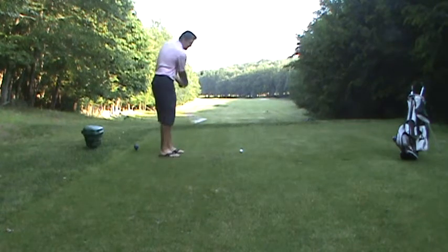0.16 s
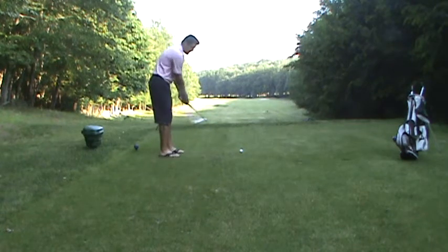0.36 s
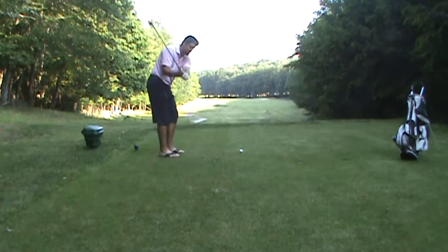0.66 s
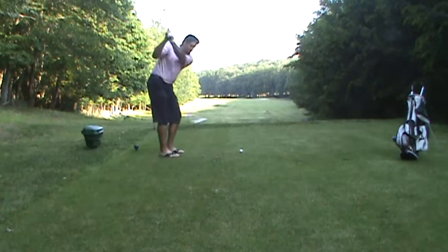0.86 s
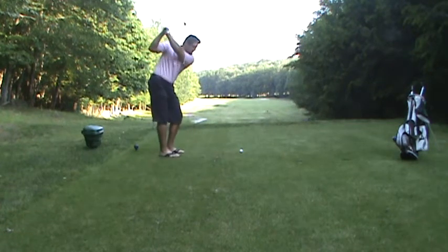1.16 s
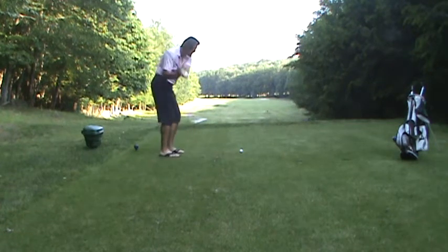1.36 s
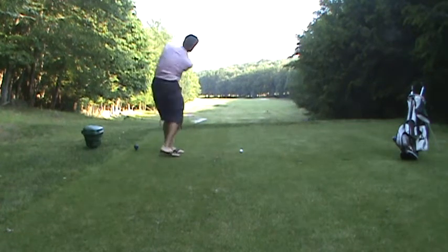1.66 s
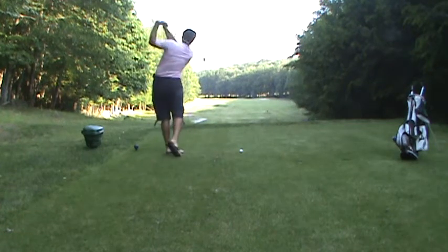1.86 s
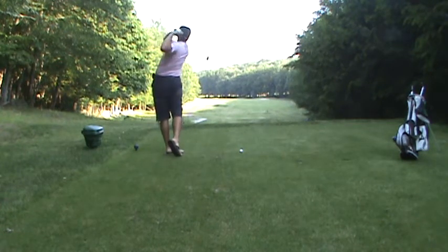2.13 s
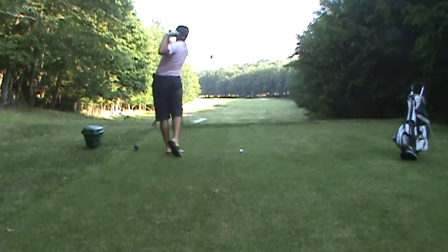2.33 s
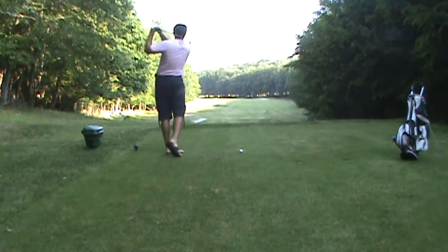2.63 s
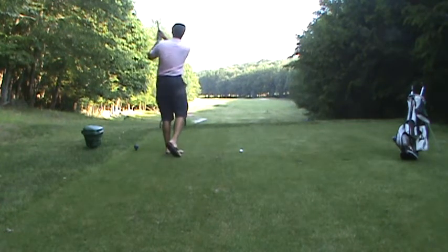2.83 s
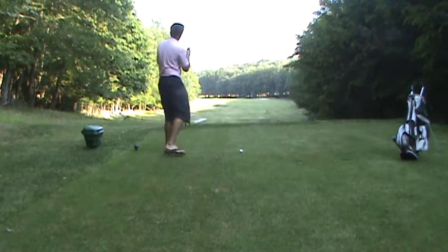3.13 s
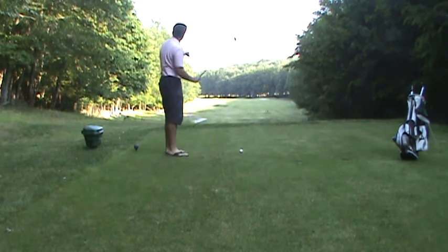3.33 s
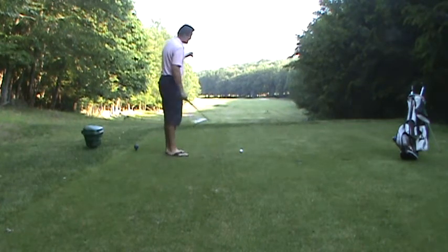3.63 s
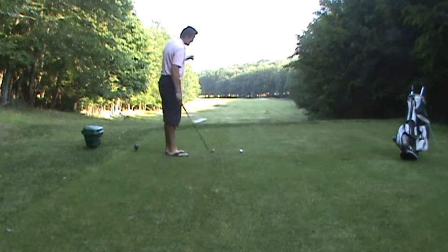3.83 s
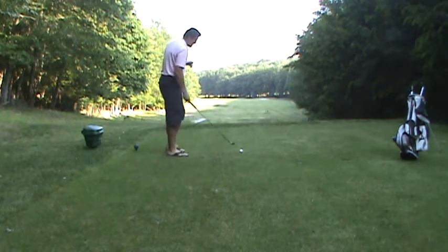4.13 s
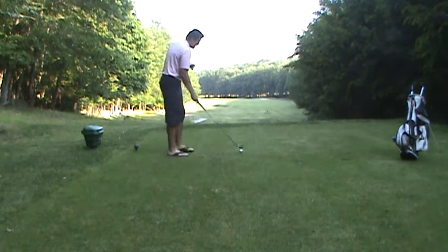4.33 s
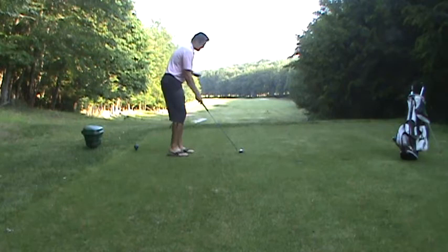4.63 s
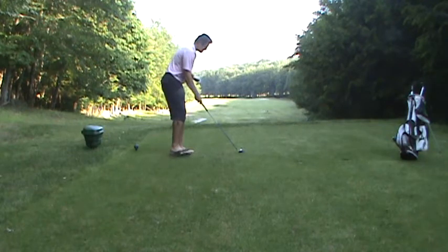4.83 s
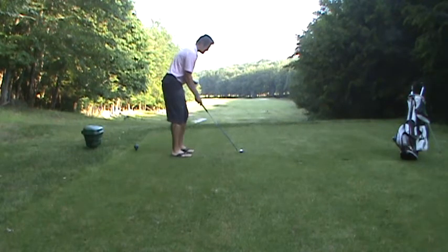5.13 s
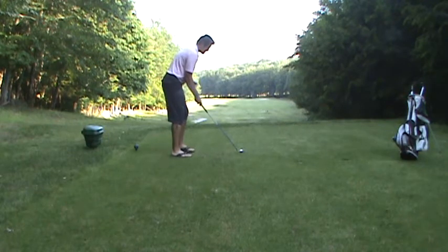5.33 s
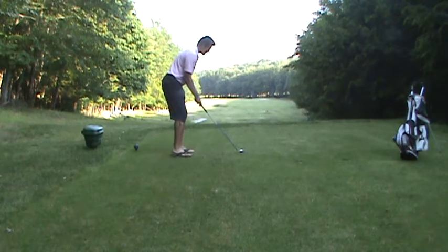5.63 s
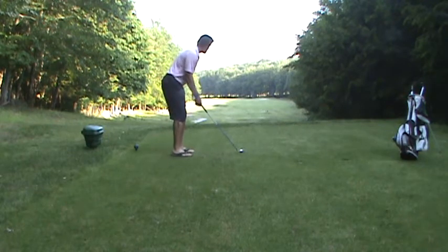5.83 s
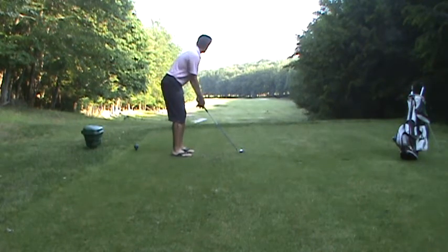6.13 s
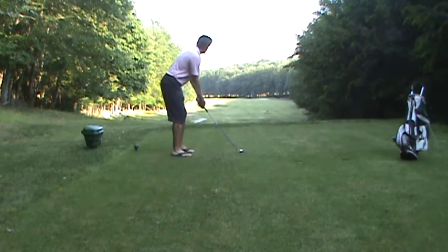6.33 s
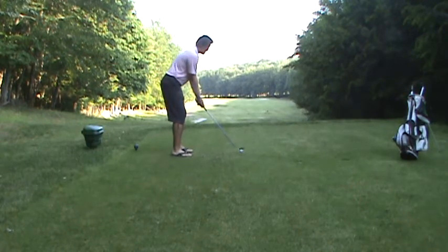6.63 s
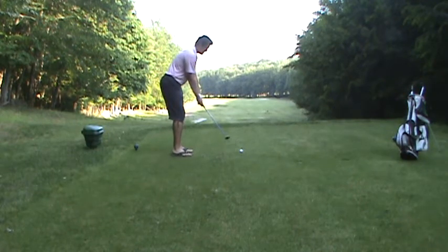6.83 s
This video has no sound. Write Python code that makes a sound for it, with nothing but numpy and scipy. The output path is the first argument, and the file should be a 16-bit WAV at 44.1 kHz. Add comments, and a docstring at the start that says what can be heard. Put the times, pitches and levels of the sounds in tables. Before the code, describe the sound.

On a quiet golf tee between woods, distant engines drone over a low rumble and airy hiss. A golfer takes one practice swing, a brief swish over the grass. A sandal then slaps against a heel and the club head drops softly on the turf. Songbirds warble from the trees to the left while a small bird chips close by, and the drone grows a little louder.

```python
"""A far engine drones over a low rumble and airy hiss, on a quiet golf tee between woods.
Its partials sink in pitch as it passes, beating with a second engine. Songbirds warble in gliding
whistles that the trees scatter, and a small bird chips close by. A golfer takes a practice swing:
the shaft sheds eddies and swishes over the grass, then a sandal slaps and the club head is set
down, each a short knock of damped modes."""
import sys
import numpy as np
from scipy import signal
from scipy.io import wavfile

SR = 44100
rng = np.random.default_rng(int(sys.argv[2]) if len(sys.argv) > 2 else 0)


def store_wav(level_fs):
    """Save 16-bit WAV to argv[1]."""
    pcm = np.round(np.clip(np.atleast_2d(level_fs), -1, 1) * 32767)
    wavfile.write(sys.argv[1], SR, pcm.T.astype(np.int16))


N = 307377
TIME = np.arange(N) / SR

# colours of exhaust rumble, far roar, deep air and air hiss: (frequency [Hz], relative density [dB])
RUMBLE_COLOUR = [(20, -40), (36, -28), (55, -10), (80, 0), (120, -2), (170, 1.5), (215, -2.5), (270, -8),
                 (330, -17.5), (420, -30)]
ROAR_COLOUR = [(180, -23), (300, -4), (368, -2.5), (416, 0.5), (540, -4.5), (829, -2.5), (1120, -5.5),
               (1210, -10.5), (1700, -14), (2210, -25), (3740, -120)]
DEEP_AIR_COLOUR = [(20, -17), (36, -3.5), (55, -0.5), (75, -5)]
HISS_COLOUR = [(760, -13), (1300, -0.5), (2080, -2), (2540, -2), (3330, -3.5), (4950, -5), (7220, -15.5),
               (8270, -11.5), (8990, -7.5), (10800, -15), (15200, -16), (15800, -14.5)]
# fader rides of the low bed, before its boost: (time [s], rumble level [dB], roar level [dB])
BED_RIDES = [(0, -51.5, -58.5), (0.9, -46.5, -58.5), (1.3, -54, -57.5), (2.1, -49.5, -58), (3.3, -47, -54),
             (5.1, -47.5, -56), (5.9, -46, -54), (6.96, -47.5, -57.5)]
# stereo image of the noises: (frequency [Hz], left-right likeness [1 = mono])
STEREO_LIKENESS = [(60, 0.99), (130, .98), (290, 0.64), (640, 0.18), (1410, 0.14), (3100, 0.56),
                   (6820, 0.45), (15000, 1)]

# firing note of the passing engine: (time [s], level [dB])
FIRING_RIDE = [(0, -57), (.6, -51), (1.7, -58), (2.2, -40.5), (2.6, -43), (3, -36.5), (4.1, -35),
               (4.7, -37.5), (5.3, -39), (5.85, -34), (6.3, -41), (6.96, -38)]
# overtones that open up as it drives away:
# (multiple of the cycle rate, level before [dB], level after [dB], time of the change [s])
OPENING_PARTIALS = [(8, -50.5, -45.5, 3.65), (10, -58, -40.5, 4.7)]
# its weak partials: (multiple of the cycle rate, level from the closest point on [dB])
WEAK_PARTIALS = [(2, -64.5), (3, -62), (4, -53.5), (6, -54.5), (7, -53), (9, -54), (11, -60), (13, -66),
                 (15, -59.5), (25, -67)]
# second engine, speeding up: (time [s], firing rate [Hz], level [dB])
SECOND_ENGINE_RIDE = [(0, 93.4, -52), (.9, 93.7, -49.5), (1.5, 97, -44), (2.1, 100.7, -42.5),
                      (2.6, 105, -49), (3.2, 105.1, -42.5), (4.2, 103.1, -48.5), (5.5, 103.5, -47),
                      (6.97, 103.5, -50)]
# faint machine whine: (pitch [Hz], level [dB])
WHINE_TONES = [(701, -69.5), (840.5, -68.5)]

# far bird phrases and echoes of the near songbird, scattered by the trees:
# (start [s], length [s], centre pitch [Hz], level into the echo [dB])
SCATTERED_PHRASES = [(.14, .2, 3600, -58), (.37, .24, 2750, -60), (1.49, .13, 4000, -54.5),
                     (1.6, .15, 2950, -56.5), (2.499, .3, 3750, -55), (3.65, 0.27, 4496, -57),
                     (3.95, .27, 2950, -52.5), (4.6, .14, 2300, -54.5), (4.961, .3, 3100, -52.5),
                     (5.551, 0.12, 2276, -56), (6.139, 0.25, 2850, -55)]
# thin high whistles of a far bird: (start [s], level into the echo [dB])
THIN_WHISTLES = [(.29, -69.5), (.93, -68.5), (1.44, -66.5), (2.13, -68), (2.75, -68), (3.23, -66),
                 (3.8, -68), (4.52, -66), (4.93, -65.5), (5.55, -68.5), (6.5, -70)]
# the songbird's syllables, by name: (start pitch, end pitch) [ratios to the middle pitch]
SYLLABLE_BENDS = {"fall": (1.15, .83), "rise": (.88, 1.19), "arch": (.89, .87), "hold": (.96, .95),
                  "sag": (1.1, .98)}
# its song: (start [s], length [s], middle pitch [Hz], level before the mix [dB], syllable name)
SONG_NOTES = [(2.46, .05, 2483, -55, "sag"), (2.558, .066, 2210, -54.5, "sag"),
              (2.665, 0.071, 2560, -51.5, "arch"), (3.045, .058, 2800, -52.5, "arch"),
              (3.15, .06, 2880, -53.5, "arch"), (3.29, .2, 3030, -64, "hold"),
              (3.375, .022, 2410, -55, "rise"), (3.42, .028, 2410, -55.5, "sag"),
              (3.495, .059, 2524, -52, "rise"), (3.55, 0.081, 2360, -49.5, "sag"),
              (3.662, 0.038, 2340, -51, "arch"), (3.774, 0.052, 1980, -55, "sag"),
              (3.87, 0.056, 2280, -57, "sag"), (4.481, 0.072, 2210, -58.5, "hold"),
              (4.553, .071, 2447, -52.5, "fall"), (4.644, 0.057, 2330, -50.5, "fall"),
              (4.762, .04, 2360, -52, "rise"), (4.8, .046, 2400, -51.5, "fall"),
              (5.079, 0.068, 2095, -55, "hold"), (5.54, 0.17, 3003, -58.5, "hold"),
              (5.599, .03, 2420, -49, "hold"), (6.183, .072, 2026, -56, "hold")]
# double chips of the small bird: (start [s], level before shaping [dB])
CHIP_CUES = [(.565, -55), (1.557, -47), (2.017, -46.5), (3.317, -44.5), (3.822, -45), (4.0, -51.5),
             (4.135, -52), (4.555, -52), (4.705, -50.5), (5.208, -51.5), (5.515, -46.5), (5.934, -47.5),
             (6.528, -50), (6.868, -54)]
# contour of one chip: (time from its start [s], pitch [ratio to the lowest], relative level [dB])
CHIP_CONTOUR = [(0, 1.32, -27), (.005, 1.17, -8), (.01, 1.02, -7.5), (.016, 1, -5.5), (.02, 1.08, -7.5),
                (.023, 1.25, -9), (.028, 1.08, -10), (.036, 1.1, -13.5), (.043, 1.15, -9)]
# one loud downslurred call and a soft answer: (time [s], pitch [Hz], level [dB])
LOUD_CALL = [(5.364, 11300, -66), (5.369, 11100, -55), (5.38, 7800, -43), (5.387, 6970, -41.5),
             (5.396, 6760, -40), (5.405, 6950, -47), (5.419, 7300, -48), (5.423, 7400, -66)]
SOFT_ANSWER = [(5.855, 7880, -67), (5.88, 7920, -58), (5.89, 7700, -62), (5.9, 7570, -52),
               (5.912, 7550, -72)]

# swell of the swish: (time [s], level [dB])
SWISH_RIDE = [(1.46, -66), (1.52, -50), (1.543, -41.5), (1.556, -51), (1.6, -48), (1.68, -67), (1.75, -95)]
# colour of the shaft's eddies: (frequency [Hz], relative density [dB])
SWISH_COLOUR = [(200, -8), (350, 4), (500, 7), (750, -8.5), (1000, -5), (1600, -17), (4200, -16),
                (8000, -20), (15000, -27)]
# modes of the sandal slap and of the club head on turf: (frequency [Hz], level [dB], t60 [s])
SANDAL_MODES = [(440, -29, 0.023), (700, -29.5, 0.013), (990, -33.5, 0.0092), (3720, -36, 0.0046),
                (4900, -35, 0.0043), (9000, -39, .002)]
TURF_MODES = [(252, -37, 0.11), (304, -31, .06), (425, -33.5, 0.041), (604, -37, 0.023)]


def from_db(db):
    """Decibels to gain."""
    return 10 ** (np.asarray(db) / 20)


def rms_one(x):
    """Scale to rms 1."""
    return x / np.sqrt(np.mean(x ** 2) + 1e-20)


def in_time(rows):
    """Draw each column after the time column as a curve over the whole scene."""
    times, *columns = np.transpose(rows)
    return [np.interp(TIME, times, column) for column in columns]


def at_hz(points, hz):
    """Read a curve on a log-frequency axis."""
    frequencies, values = np.transpose(points)
    return np.interp(np.log(hz), np.log(frequencies), values)


def drift(rate_hz):
    """A smooth random modulator of rms 1, rolling off above rate_hz."""
    hop, settle = 40, 2000
    pole = np.exp(-2 * np.pi * rate_hz * hop / SR)
    white = rng.standard_normal(N // hop + settle + 2)
    slow = signal.lfilter([1], [1, -2 * pole, pole * pole], white)[settle:]
    return np.interp(np.arange(N) / hop, np.arange(len(slow)), rms_one(slow))


def tone(hz):
    """A sine of rms 1 that follows a pitch curve."""
    return np.sqrt(2) * np.sin(2 * np.pi * (np.cumsum(hz) / SR + rng.random()))


def add(out, start_s, sound):
    """Mix a sound in at its cue."""
    i = max(0, round(start_s * SR))
    out[i:i + len(sound)] += sound[:max(0, N - i)]


def pan(x, left_db):
    """Place a sound by its left-minus-right level."""
    return x * from_db([[left_db / 2], [-left_db / 2]])


def widen(mid, side, alike):
    """Blend two noises into stereo: alike is 1 for mono, 0 for fully wide."""
    return np.sqrt(1 + alike) * mid + np.sqrt(1 - alike) * side * [[1], [-1]]


def banded_noise(colour, flicker_db):
    """Third-octave bands of stereo noise, each with its own level, flicker and width; rms 1 in all."""
    out, edges = 0, np.geomspace(18, 18000, 31)
    white = rng.standard_normal((2, 2, N))
    for k, (low, high) in enumerate(zip(edges, edges[1:])):
        if high < colour[0][0] or low > colour[-1][0]:
            continue
        hz = np.sqrt(low * high)
        band = signal.butter(2, [low, high], "band", fs=SR, output="sos")
        mid, side = signal.sosfilt(band, white[k % 2])
        gain = from_db(at_hz(colour, hz) + flicker_db * drift(10.6))
        out = out + gain * widen(mid, side, at_hz(STEREO_LIKENESS, hz))
    return rms_one(out)


def woods(x, t60, alike=0.77, build_s=0.011):
    """Trunks and leaves scatter a sound into a dense dying tail, partly different on each side."""
    t = TIME[:SR]
    envelope = from_db(-60 * t / t60) * (1 - np.exp(-t / build_s))
    mid, side = rng.standard_normal((2, SR)) * envelope
    tail = rms_one(widen(mid, side, alike)) / np.sqrt(SR)
    return signal.fftconvolve(x[None], tail, axes=1)[:, :N]


def whistle(length_s, start_hz, middle_hz, end_hz, fade_s=0.006):
    """One pure note bending through three pitches, with soft ends."""
    progress = np.linspace(0, 1, round(length_s * SR))
    bend = np.polyfit([0, .5, 1], [start_hz, middle_hz, end_hz], 2)
    envelope = np.minimum(1, np.minimum(progress, 1 - progress) * length_s / fade_s)
    return tone(np.polyval(bend, progress)) * envelope


def glide(rows, octave_db):
    """A call along (time [s], pitch [Hz], level [dB]); the air absorbs its weak octave towards the top."""
    times, hz, db = np.transpose(rows)
    t = np.arange(times[0], times[-1], 1 / SR)
    pitch = np.interp(t, times, hz)
    air_gain = np.interp(2 * pitch, [13800, 15200], [1, 0])
    voice = tone(pitch) + from_db(octave_db) * tone(2 * pitch) * air_gain
    return from_db(np.interp(t, times, db)) * voice


def background(boost_db=4, air_db=-54.5):
    """The bed: exhaust rumble, a far roar, and the deep rumble and even hiss of open air."""
    rumble_db, roar_db = in_time(BED_RIDES)
    rumble = from_db(rumble_db + boost_db) * banded_noise(RUMBLE_COLOUR, flicker_db=2.0)
    roar = from_db(roar_db + boost_db) * banded_noise(ROAR_COLOUR, flicker_db=1.0)
    deep_air = banded_noise(DEEP_AIR_COLOUR, flicker_db=-0.5)
    hiss = banded_noise(HISS_COLOUR, flicker_db=0.42)
    return pan(rumble, -0.87) + pan(roar, -1.2) + from_db(air_db) * (deep_air + hiss)


def passing_engine(firing_hz=85.85, firing_order=5, doppler_hz=6.0, closest_s=3.83, pass_s=1.8):
    """Partials on multiples of the engine cycle sink as it passes; moving air makes the weak ones waver."""
    opening_s, approach_db, waver_db, wander_hz = 0.46, 4, 3, 0.91
    receding = (TIME - closest_s) / np.hypot(TIME - closest_s, pass_s)  # -1 coming, +1 going
    cycle_hz = (firing_hz - doppler_hz * receding) / firing_order * (1 + .002 * drift(3.7))
    firing_db, = in_time(FIRING_RIDE)
    out = from_db(firing_db + 1.03 * drift(3.6)) * tone(firing_order * cycle_hz)
    for order, before_db, after_db, change_s in OPENING_PARTIALS:
        opened = .5 + .5 * np.tanh((TIME - change_s) / opening_s)
        out += from_db(before_db + (after_db - before_db) * opened) * tone(order * cycle_hz)
    distance_db = approach_db * np.minimum(receding, 0)
    for order, db in WEAK_PARTIALS:
        gain = from_db(db + distance_db + waver_db * drift(1.4))
        out += gain * tone(order * cycle_hz + wander_hz * drift(3.04))
    return out


def second_engine(waver_db=2):
    """A wavering firing note climbs as the engine speeds up, beating with the passing one."""
    hz, db = in_time(SECOND_ENGINE_RIDE)
    return from_db(db + waver_db * drift(1.4)) * tone(hz)


def machine_whine(waver_db=2.0, wander_hz=1.83):
    """Two faint machine tones, unsteady in level and pitch."""
    return sum(from_db(db + waver_db * drift(3.9)) * tone(hz + wander_hz * drift(7.5))
               for hz, db in WHINE_TONES)


def scattered_phrases(note_s=0.014, step_s=.003, sink_oct_per_s=1.0, spread_oct=.32, highest_hz=5400):
    """Far bird phrases and echoes of the near songbird: quick sinking runs, scattered by the trees."""
    runs = np.zeros(N)
    for start_s, length_s, centre_hz, db in SCATTERED_PHRASES:
        offsets = rng.uniform(-0.992, 1, size=256)
        bends = 1 + 0.0697 * rng.standard_normal(size=(256, 3))
        gain = from_db(db) * np.sqrt(step_s / note_s)  # overlapping notes share the level
        for t, offset, bend in zip(np.arange(0, length_s, step_s), offsets, bends):
            hz = centre_hz * 2 ** (spread_oct * offset + sink_oct_per_s * (length_s / 2 - t))
            if hz < highest_hz:
                add(runs, start_s + t, gain * whistle(note_s, *(hz * bend)))
    blur = from_db(-2.0) * woods(runs, t60=0.14, alike=0.88)
    tail = from_db(-4.0) * woods(runs, t60=1.2, alike=0.82)
    return pan(blur + tail, 2.2)


def thin_calls(length_s=.34, fade_s=.08, centre_hz=8900, rise_hz=199, quaver_hz=270, wander_hz=110):
    """A far bird repeats one quavering, slightly rising whistle, heard only through the trees."""
    out, t = np.zeros(N), np.arange(0, length_s, 1 / SR)
    swell = np.minimum(1, np.minimum(t, length_s - t) / fade_s)
    pitch = centre_hz + quaver_hz * drift(195) + wander_hz * drift(.5)
    rise = rise_hz * (t / length_s - .5)
    for start_s, db in THIN_WHISTLES:
        hz = np.interp(start_s + t, TIME, pitch) + rise
        add(out, start_s, from_db(db) * swell * tone(hz))
    return woods(out, t60=.35, alike=0.64)


def songbird(direct_db=-3.5, leaves_db=-8.0, echo_db=-6, flutter_db=3.0):
    """Slurred syllables from the trees on the left, roughened by the foliage."""
    song = np.zeros(N)
    for start_s, length_s, hz, db, syllable in SONG_NOTES:
        start, end = SYLLABLE_BENDS[syllable]
        add(song, start_s, from_db(db) * whistle(length_s, start * hz, hz, end * hz))
    song *= from_db(flutter_db * drift(37))
    leaves = from_db(leaves_db) * woods(song, t60=0.26, alike=0.43)
    tail = from_db(echo_db) * woods(song, t60=1.0, alike=0.62)
    return pan(from_db(direct_db) * song + leaves, 5.3) + pan(tail, 3.9)


def small_bird(dip_hz=7000, drop_hz_per_db=27, direct_db=-3, flutter_db=2):
    """Each chip dips twice in pitch and is smeared by nearby leaves; the loud call comes through clearly."""
    chips, calls = np.zeros((2, N))
    average_db = np.mean([db for _, db in CHIP_CUES])
    for start_s, db in CHIP_CUES:
        lowest_hz = dip_hz - drop_hz_per_db * (db - average_db)  # a louder chip dips lower
        contour = np.array(CHIP_CONTOUR) * [1, lowest_hz, 1] + [0, 0, db]
        add(chips, start_s, glide(contour, octave_db=-28))
    for call in (LOUD_CALL, SOFT_ANSWER):
        add(calls, call[0][0], glide(call, octave_db=-15))
    direct = calls + chips * from_db(direct_db + flutter_db * drift(60))
    leaves = from_db(-5) * woods(chips, t60=.1) + from_db(-10) * woods(calls, t60=0.18)
    tail = from_db(-19) * woods(chips + calls, t60=0.76)
    return pan(direct, .7) + leaves + tail


def knock(modes, start_s, contact_s):
    """A blow sets damped modes ringing, neighbours in opposite sense; a soft contact slows the attack."""
    out, t = np.zeros(N), TIME[:SR // 4]
    ring = sum((-1) ** k * from_db(db - 60 * t / t60) * np.sin(2 * np.pi * hz * t)
               for k, (hz, db, t60) in enumerate(modes))
    add(out, start_s, ring * (1 - np.exp(-t / contact_s)))
    return out


def sandal_and_club(echo_db=-15):
    """A sandal snaps against the heel, then the club head drops on the turf."""
    slap = knock(SANDAL_MODES, start_s=3.021, contact_s=.00005)
    thud = knock(TURF_MODES, start_s=3.7905, contact_s=0.0012)
    return slap + thud + from_db(echo_db) * woods(slap + thud, t60=0.34)


def swing():
    """The shaft sheds eddies, loudest as the head sweeps through the bottom of the arc."""
    level_db, = in_time(SWISH_RIDE)
    return from_db(level_db) * banded_noise(SWISH_COLOUR, flicker_db=0.5)


def scene():
    """The whole tee: engines and air, the golfer, and the birds around."""
    bed = passing_engine() + second_engine() + machine_whine() + background()
    golfer = sandal_and_club() + swing()
    birds = songbird() + scattered_phrases() + thin_calls() + small_bird()
    return bed + golfer + birds


def record(dry):
    """A steep low-pass takes off the very top."""
    cutoff_hz = 15800
    return signal.sosfilt(signal.ellip(12, .1, 80, cutoff_hz, fs=SR, output="sos"), dry)


dry = scene()
out = record(dry)
store_wav(out)
```